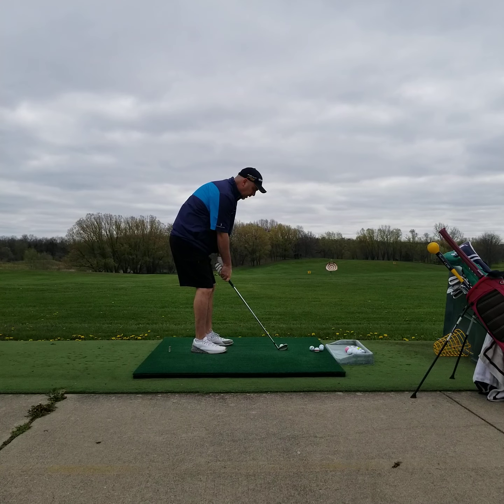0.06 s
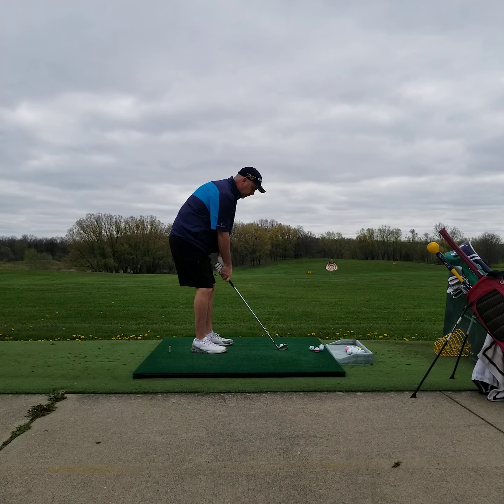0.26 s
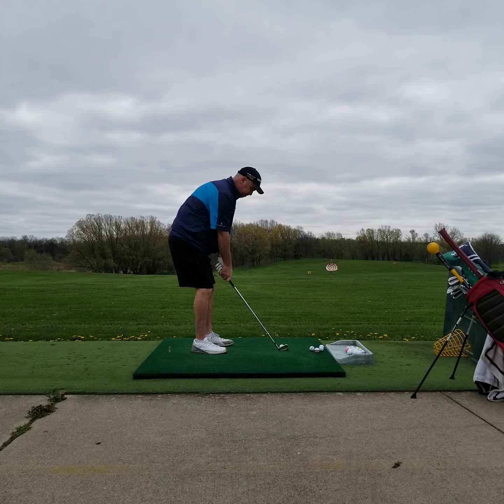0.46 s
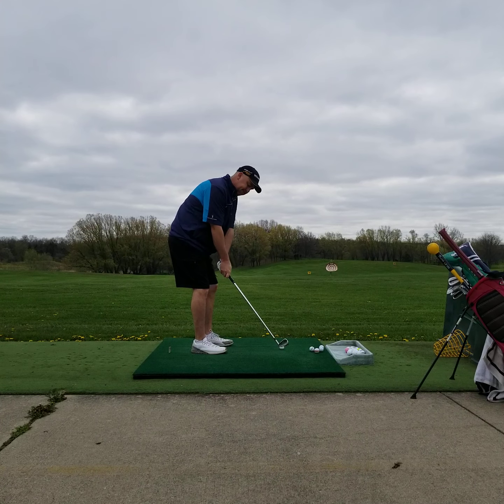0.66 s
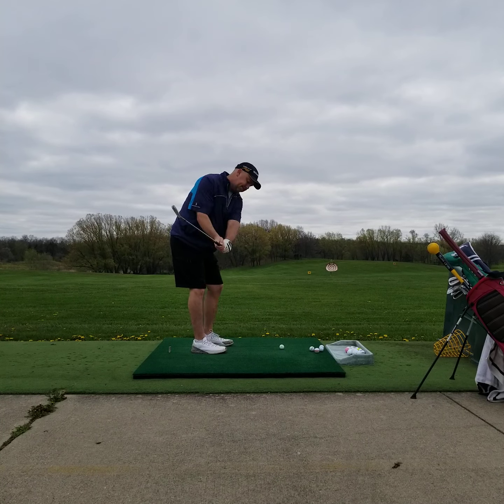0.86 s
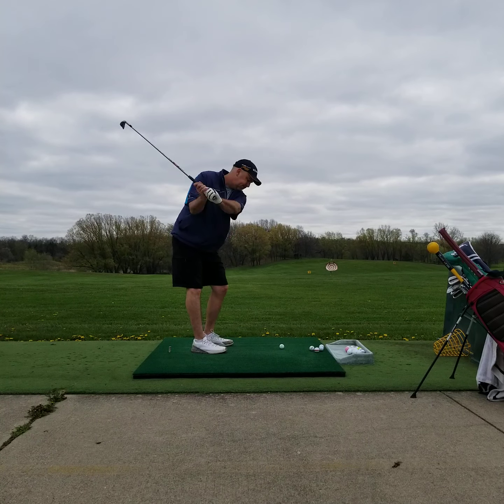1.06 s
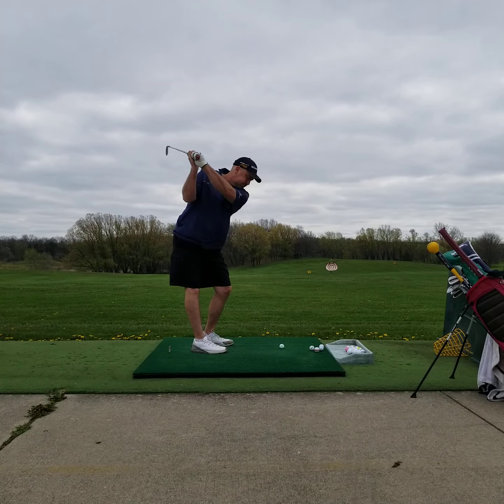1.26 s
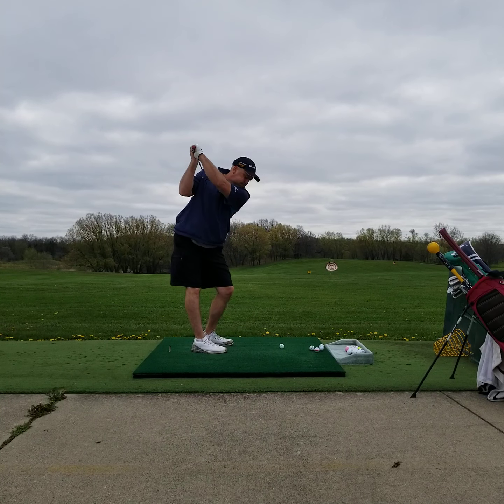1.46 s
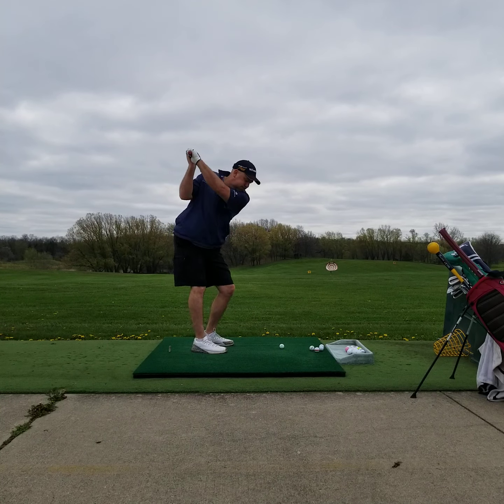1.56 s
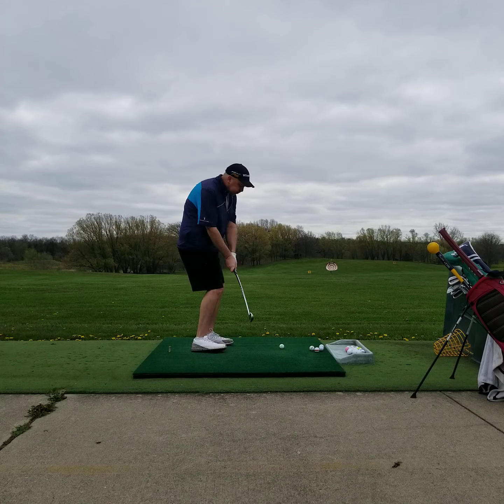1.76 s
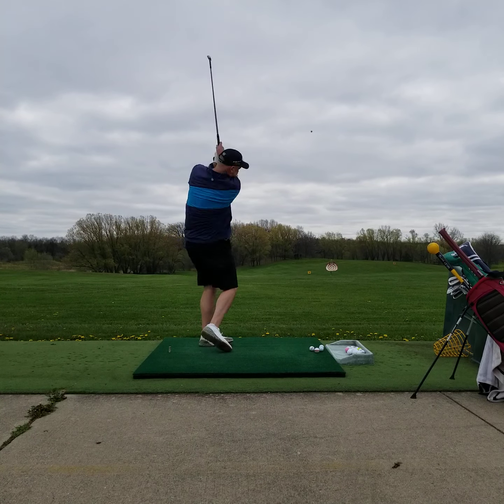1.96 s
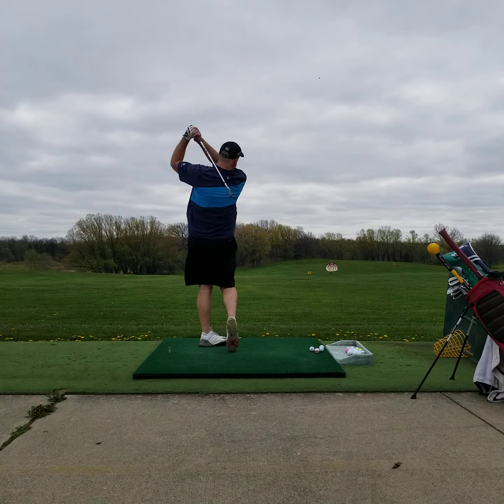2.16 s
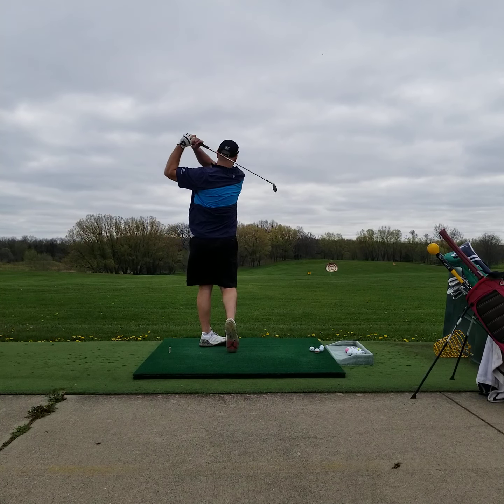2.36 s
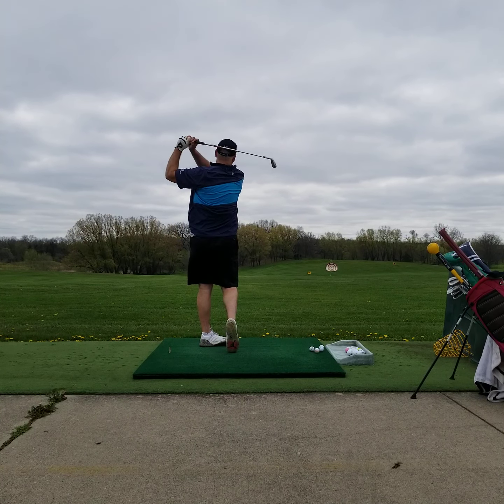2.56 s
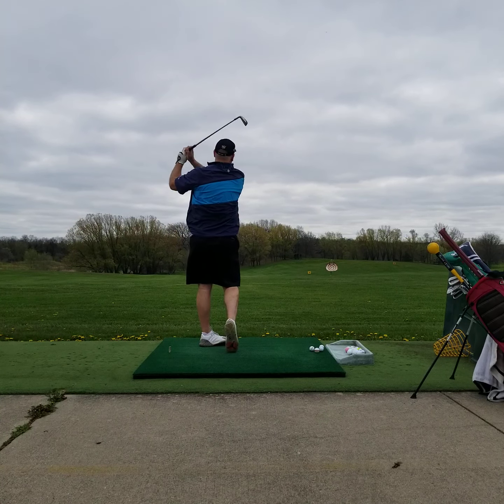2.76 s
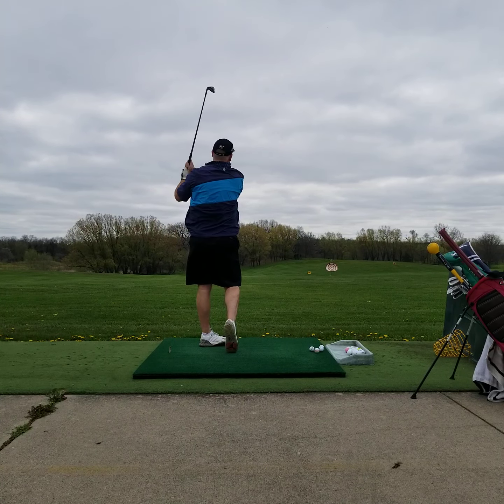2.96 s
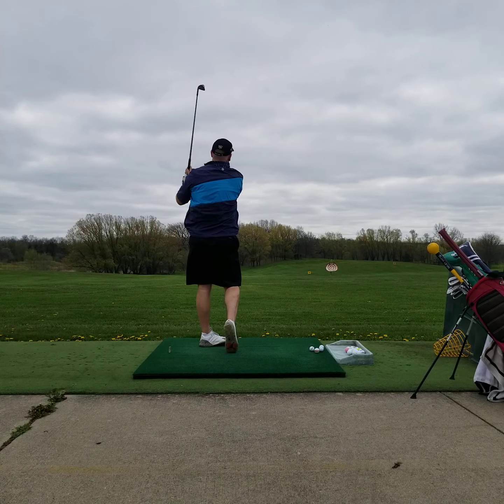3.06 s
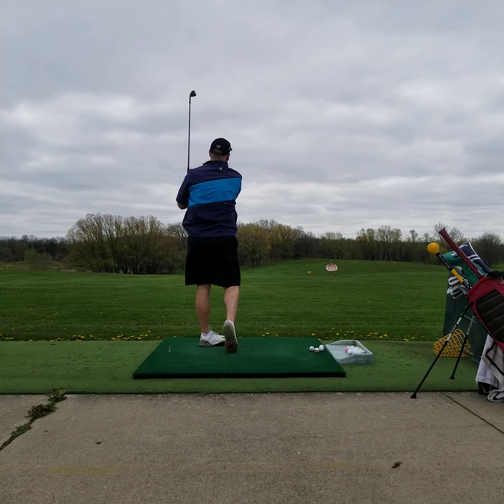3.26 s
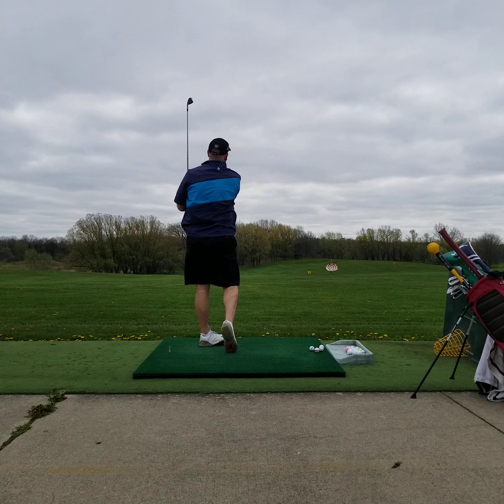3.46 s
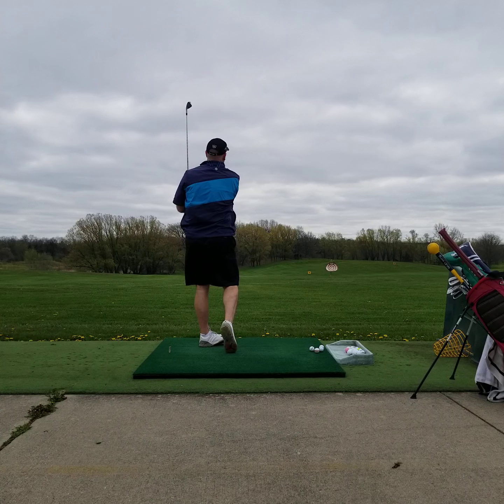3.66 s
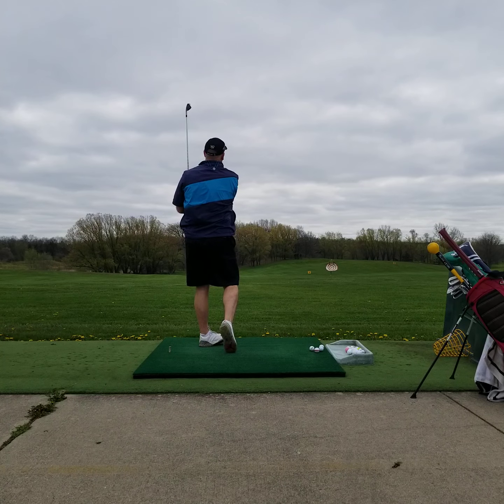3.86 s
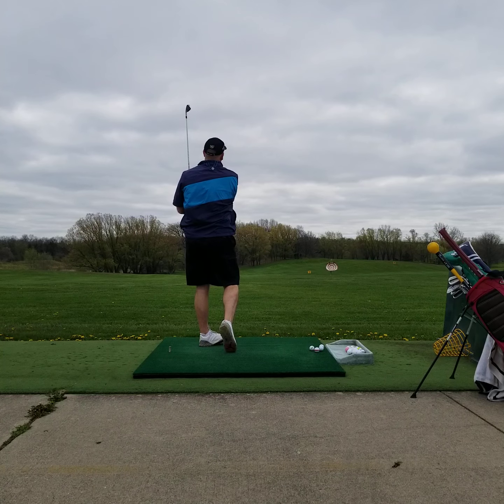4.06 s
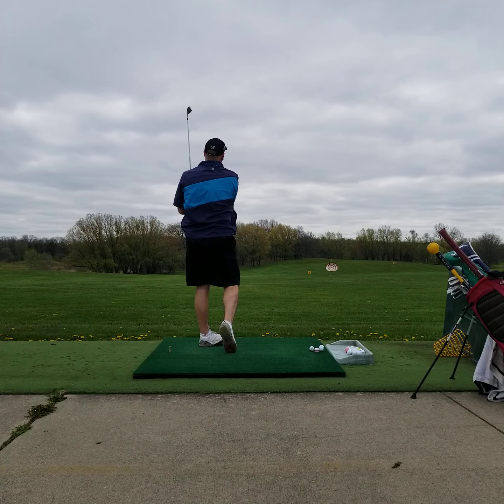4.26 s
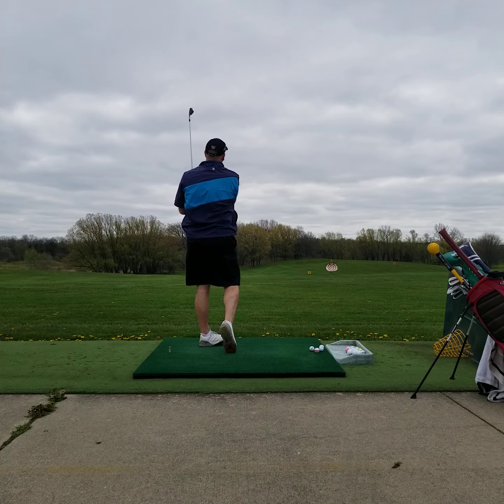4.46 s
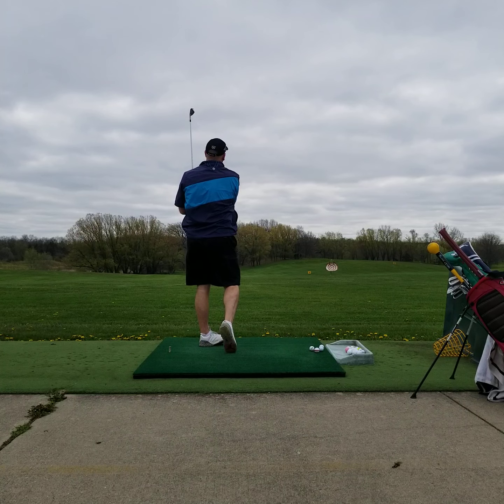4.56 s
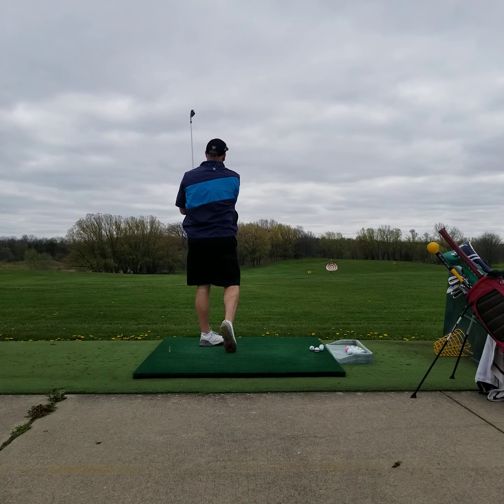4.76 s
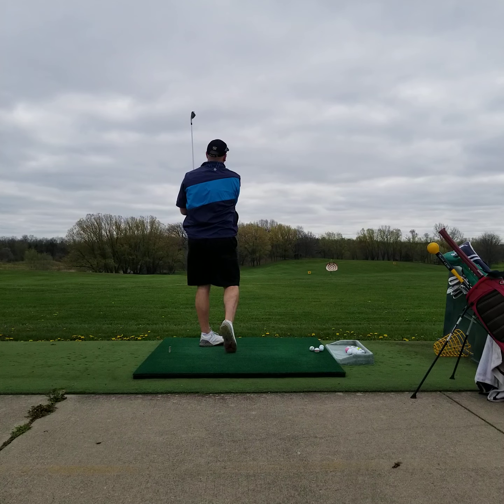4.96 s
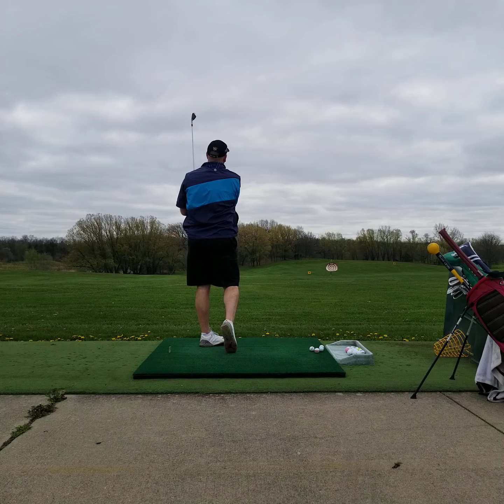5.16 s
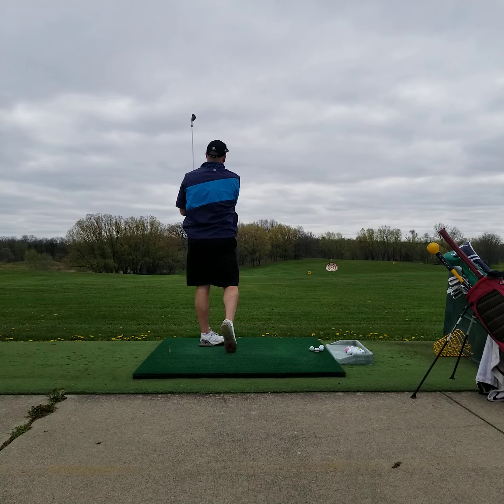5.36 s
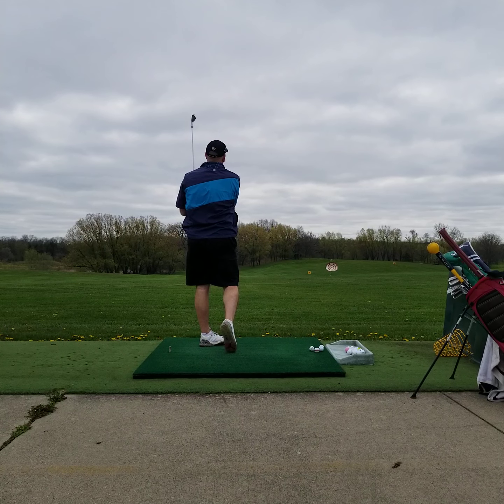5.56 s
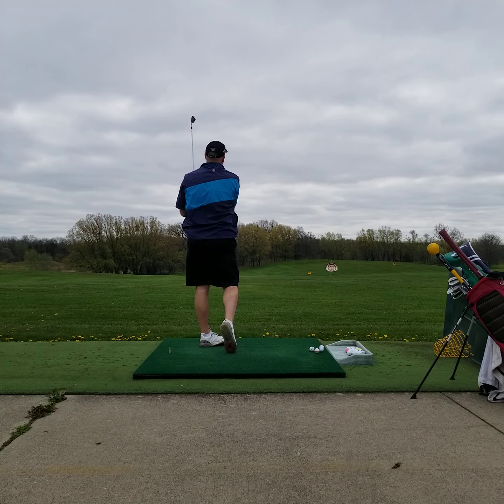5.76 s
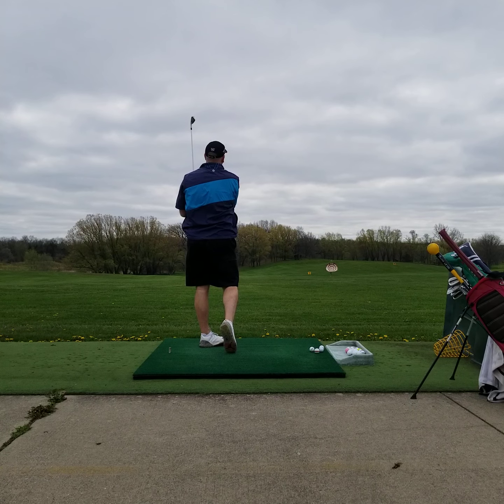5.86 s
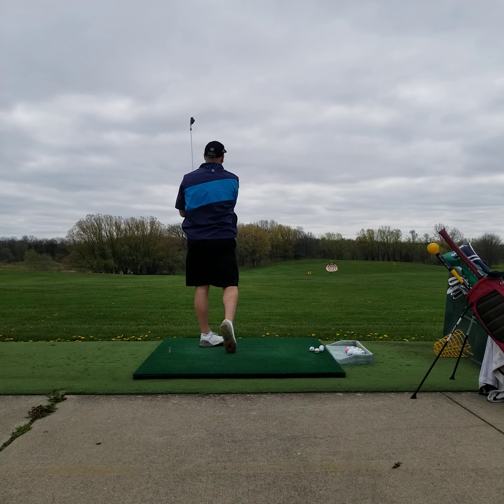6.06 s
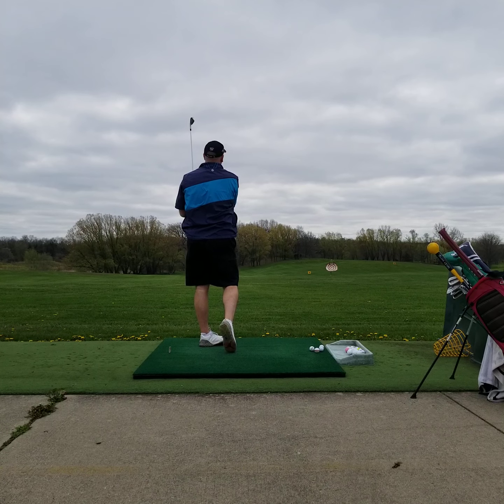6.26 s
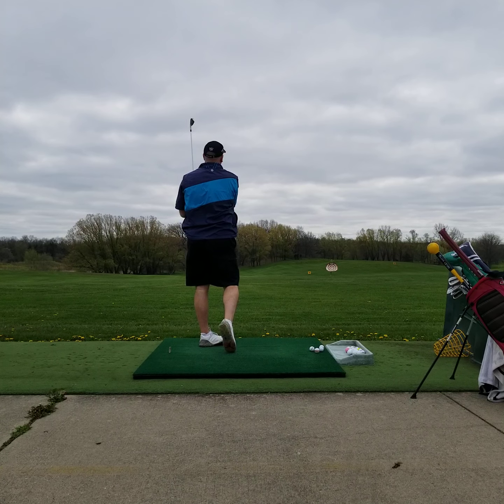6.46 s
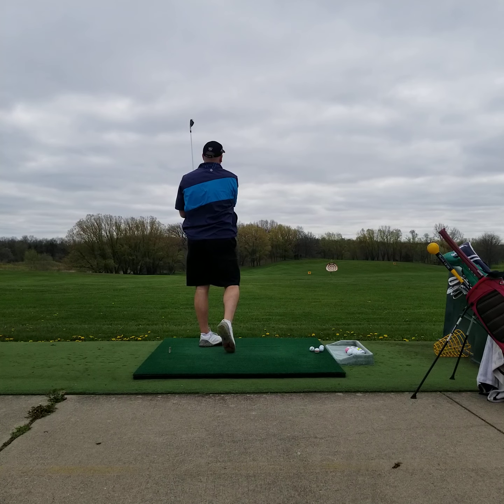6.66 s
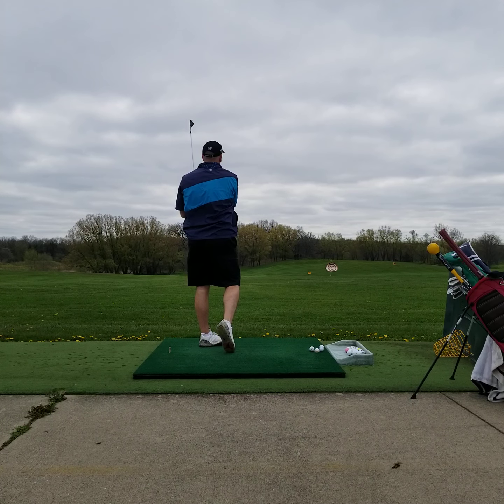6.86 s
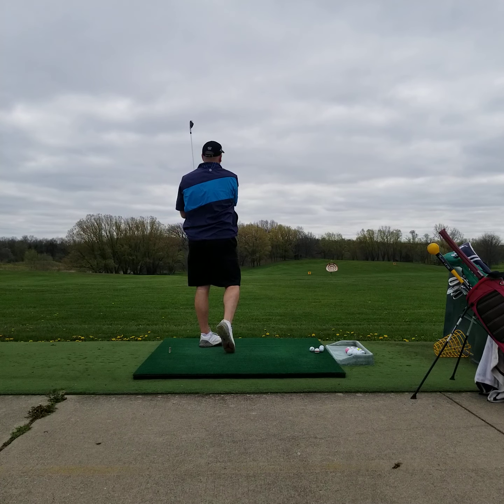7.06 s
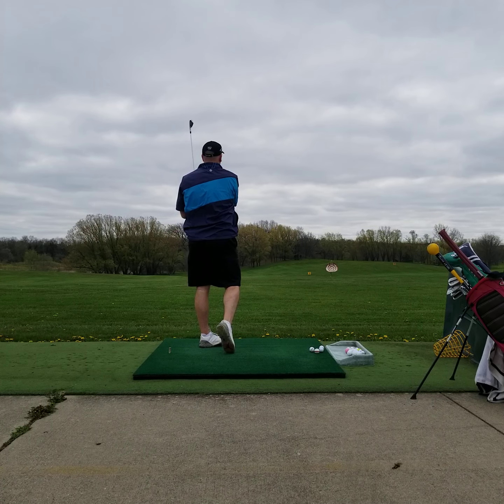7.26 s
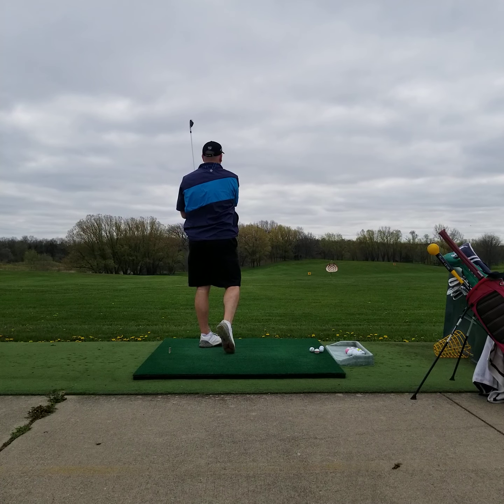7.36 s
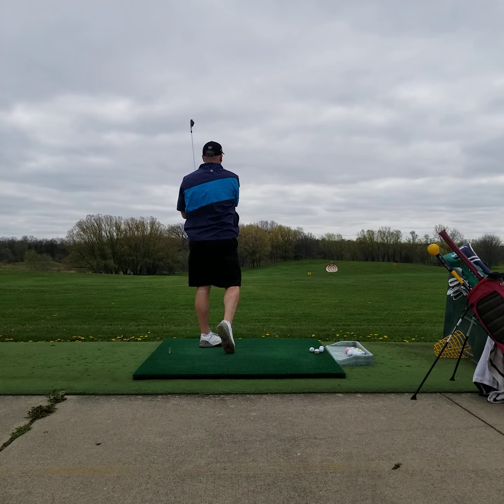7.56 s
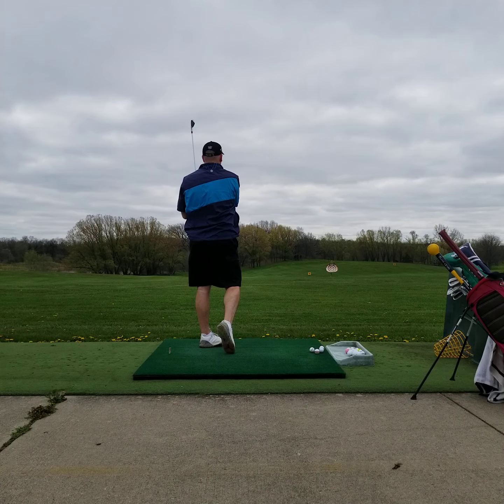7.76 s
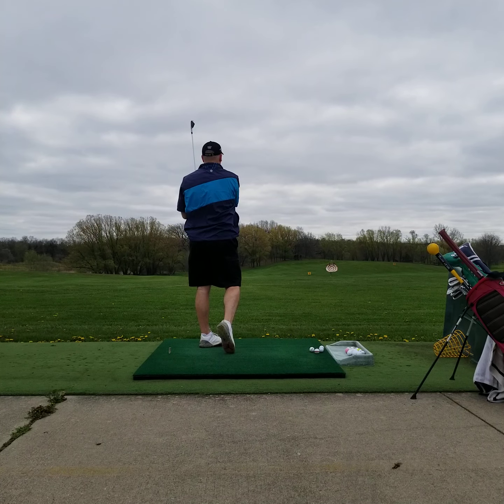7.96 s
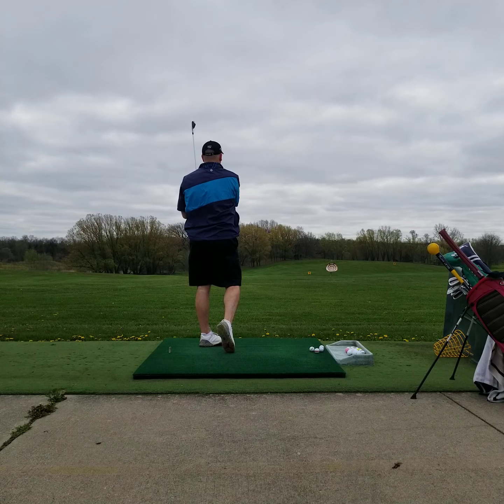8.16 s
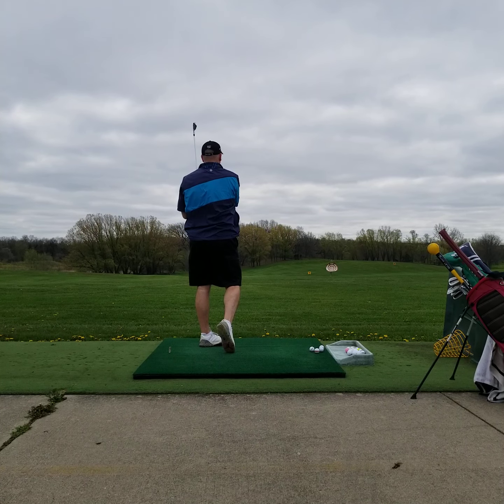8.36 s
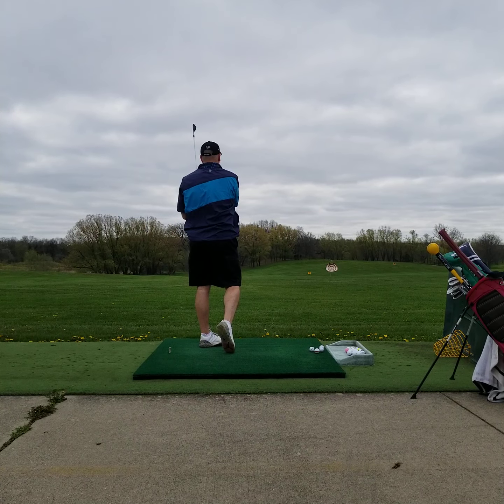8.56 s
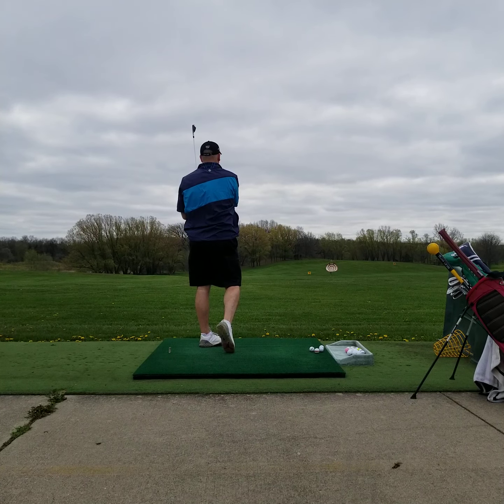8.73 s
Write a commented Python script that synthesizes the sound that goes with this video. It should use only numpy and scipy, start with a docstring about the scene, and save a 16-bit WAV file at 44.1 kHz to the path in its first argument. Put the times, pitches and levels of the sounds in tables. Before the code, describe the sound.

On an outdoor practice range, a golf club swishes through the air and hits a ball with one sharp crack, brushing the mat. Behind it, a low engine drones over road noise, growing louder, sagging slightly in pitch and then revving up near the end. Wind buffets the microphone in low gusts, and birds chirp faintly in the distance.

```python
"""An engine drones over road noise while wind buffets two closely spaced microphone ports.
At 1.8 s comes an iron shot on a practice range: the shaft sheds eddies and swishes, the face cracks
on the ball, and the sole brushes the mat. The engine, a periodic train of exhaust pulses, draws near,
sags in pitch and revs up; a steady motor hums behind it, and late on a second engine joins in.
Birds call faintly from the trees."""
import sys
import numpy as np
from scipy import signal
from scipy.fft import rfft, irfft, next_fast_len
from scipy.io import wavfile
from scipy.ndimage import map_coordinates

SR = 44100
rng = np.random.default_rng(int(sys.argv[2]) if len(sys.argv) > 2 else 0)


def master(y):
    """Save y as 16-bit WAV."""
    cut = np.clip(np.atleast_2d(y).T, -1, 1)
    pcm = np.round(cut * 32767)  # scale
    wavfile.write(sys.argv[1], SR, pcm.astype(np.int16))


N = 410571
T = np.arange(N) / SR
FFT_SIZE = next_fast_len(N)
BIN_HZ = np.maximum(np.fft.rfftfreq(FFT_SIZE, 1 / SR), 1)

# engine speed: time_s, firing_hz
FIRING_RATE = [(0, 96), (2.5, 95), (4.2, 92.2), (5.1, 90.4), (5.8, 88.4), (6.9, 84.77), (7.92, 82.7),
               (8.0, 91.14), (8.07, 103.4), (8.2, 134.4), (8.4, 148), (8.6, 158), (8.85, 162), (9.31, 161)]
# the engine nears: time_s, tone_at_resonance_db, overtone_gain_db
ENGINE_LEVELS = [(0, -45, -64.5), (1.65, -36, -57), (2.1, -45.5, -63), (2.8, -38.5, -58),
                 (3.85, -32.5, -58), (4.3, -23.5, -50), (5.7, -19, -48), (6.85, -18.5, -39),
                 (7.4, -21.5, -43), (7.75, -19.5, -40.5), (8.05, -19.5, -41.5), (8.25, -18.5, -49),
                 (8.7, -13.5, -46), (9.31, -15, -42.5)]
# traffic moving left to right: time_s, left_port_lag_s
TRAFFIC_LAG = [(0, -2e-5), (5.5, -3e-5), (7, 1e-5), (8, 6e-5), (9.3, 6.5e-5)]
# brief dips in the low end: centre_s, length_s, tone_depth_db
DIPS = [(0.067, 0.052, 9), (0.198, 0.12, 22), (1.095, 0.075, 30), (1.245, 0.17, 14), (1.462, 0.038, 30),
        (2.241, 0.19, 12), (2.56, 0.12, 5), (3.636, 0.049, 16), (3.823, 0.016, 14), (4.226, 0.017, 10),
        (4.318, 0.014, 9), (5.768, 0.032, 23), (6.322, 0.024, 11.5), (6.473, .03, 3), (6.559, 0.05, 27),
        (7.207, 0.043, 6), (7.482, 0.11, 6)]
# engine spectra: frequency_hz, gain_db
EXHAUST_SPECTRUM = [(165, 0), (182, 8), (200, 6), (255, 2), (280, 4), (340, -5), (370, -8), (440, -5),
                    (520, -17), (800, -25), (1400, -41)]
GROWL_SPECTRUM = [(200, -20), (310, 6.5), (350, 10.5), (435, 9.5), (490, -0.5), (700, -31)]  # uneven combustion
# road noise: time_s, roar_gain_db, rumble_gain_db, tread_gain_db, hiss_gain_db
ROAD_GAINS = [(0, -52.5, -49, -57, -83.5), (1.5, -50.5, -50, -57, -78.5), (2.4, -55, -50, -61, -82.5),
              (3.95, -52, -45.5, -60.5, -84.5), (4.3, -49.5, -38.5, -56.5, -76),
              (5.3, -46.5, -40.5, -58.5, -73.5), (6.7, -42.5, -35.5, -61, -67),
              (7.25, -38.5, -37.5, -55, -64.5), (8.1, -38.5, -34, -50, -64),
              (8.5, -39.5, -31.5, -51.5, -60.5), (9.31, -37, -34.5, -43, -62)]
# finest tyre noise, heard only close by: time_s, level_db
SPIT_LEVEL = [(6.5, -94), (7.2, -74), (7.9, -85), (8.4, -78), (9.4, -72)]
# single cars come into the clear: centre_s, length_s, boost_db
CAR_SURGES = [(7.22, .3, 2), (9.24, .16, 2.5)]
# road spectra: frequency_hz, gain_db
ROAR_SPECTRUM = [(200, -26), (420, -1.5), (600, 1), (800, 1), (1100, -1.5), (1600, -10), (2100, -15.5),
                 (4000, -39)]
RUMBLE_SPECTRUM = [(70, -31), (120, -4), (190, 1.5), (320, -3.5), (450, -7.5), (700, -25), (1500, -69)]
TREAD_SPECTRUM = [(700, -32), (1250, 2), (1600, 3), (2100, -5), (2700, -12), (3400, -26.5), (6000, -51.5)]
TYRE_HISS_SPECTRUM = [(1500, -15), (2800, 2), (4200, -1), (6400, -6.5), (7600, -9), (8300, -20),
                      (11000, -15.5), (13000, -17), (16000, -20)]
SPIT_SPECTRUM = [(7000, -8), (8600, 2), (10000, -5), (12000, -18)]
WHINE_SPECTRUM = [(700, -26), (795, -0.5), (880, -25)]
# gusts on the ports: peak_s, level_db
WIND_GUSTS = [(.12, -38), (.96, -38.5), (1.38, -44), (3.58, -43.5), (4.3, -36.5), (4.899, -34), (5.16, -44),
              (5.83, -27.5), (6.3, -26.5), (7.41, -26.5), (8.299, -48), (8.86, -28.5)]
# swells of high hiss: centre_s, length_s, level_db
AIR_SWELLS = [(1.35, 2, -70), (7.22, 0.36, -69.5), (7.75, 0.95, -73), (9.3, 0.54, -70)]
# wind spectra: frequency_hz, gain_db
BUFFET_SPECTRUM = [(18, -17), (32, -13), (50, -0.5), (75, 1), (110, -4.5), (170, -15.5), (300, -21.5),
                   (600, -45.5), (1500, -77.5)]
AIR_SPECTRUM = [(3000, -14), (6500, -10.5), (9000, -16.5), (11000, -6), (12500, -0.5), (15500, 0),
                (17000, -6.5)]
# single eddies: centre_s, pitch_hz, length_s, level_db
EDDIES = [(0.103, 77.5, 0.017, -24.5), (0.595, 55, 0.058, -28.5), (1.353, 78.4, 0.018, -24.5)]
# distant calls: centre_s, pitch_hz, length_s, level_db, fall_fraction
BIRD_CALLS = [(.34, 3950, .16, -83, .01), (3.62, 5230, .14, -86, 0), (4.36, 5700, .06, -83, .02),
              (4.74, 5330, .22, -85, 0), (5.12, 3980, .28, -82, .02), (6.02, 3300, .04, -70, .04),
              (6.14, 3300, .06, -72, .04), (6.28, 3300, .1, -71, .04), (6.38, 3800, .05, -71, .06),
              (6.44, 3230, .05, -70, .04), (6.53, 3170, .04, -69, .04), (6.62, 3330, .04, -66, .05),
              (6.63, 3750, .04, -68, .07), (6.78, 3280, .05, -68, .04), (6.9, 3750, .05, -68, .04),
              (6.91, 4150, .04, -66, .07), (7.1, 3300, .04, -66, .04), (7.12, 4150, .2, -73, 0),
              (7.13, 6000, .06, -72, .05), (7.42, 4130, .1, -72, .01), (7.51, 3700, .06, -69, .03),
              (7.84, 5100, .04, -70, .06)]
# many birds blurred together: frequency_hz, gain_db
TWITTER_SPECTRUM = [(3200, -9.5), (3900, 1.5), (5200, 0), (6200, -5), (7500, -20)]
# clothes moving: centre_s, length_s, level_db
CLOTH_RUSTLES = [(.87, .22, -76), (1.67, .04, -69), (2.04, .12, -74), (3.45, .4, -79.5)]
# club through the air, sole over the mat: time_s, gain_db
SWISH_ENVELOPE = [(1.62, -61), (1.762, -55), (1.775, -50), (1.797, -36), (1.815, -40), (1.83, -46.5),
                  (1.88, -57), (1.97, -77)]
BRUSH_ENVELOPE = [(1.826, -46), (1.831, -29), (1.837, -32), (1.843, -32), (1.853, -29.5), (1.861, -39),
                  (1.878, -45), (1.93, -70)]
# ball and club head ringing together: pitch_hz, level_db, t60_s
IMPACT_MODES = [(520, -22, 0.022), (1157, -16, .026), (1720, -29, 0.045), (1990, -25, 0.022),
                (2320, -29, 0.045), (2730, -42, .13), (2914, -40, .11), (4390, -27, 0.022),
                (4600, -46, .12), (5570, -29, 0.018), (7300, -23.5, 0.017), (9300, -34, 0.009),
                (11200, -23, .011), (12900, -19, .014)]
# spectra of the shot: frequency_hz, gain_db
CLOTH_SPECTRUM = [(2500, -3), (4500, 3), (8500, -7.5), (12000, -12)]
SHAFT_SPECTRUM = [(2500, -10), (4000, -0.5), (6300, 2), (9000, -9)]
BRIGHT_HISS_SPECTRUM = [(1800, -8), (3000, -2.5), (5500, -2), (8000, -12)]
SWISH_SPECTRUM = [(150, -13), (350, -5), (520, 2.5), (650, -1), (820, -5.5), (1500, -8.5), (2400, -13.5),
                  (4000, -23), (8000, -27), (15000, -26)]
CRACK_SPECTRUM = [(500, -14), (1500, -9), (2300, -6), (3200, -12), (6000, -3), (8500, -3), (10000, -3),
                  (11500, 1), (13000, 3), (16000, -2), (18000, -20)]
TURF_SPECTRUM = [(120, -5.5), (300, 7), (600, 3.5), (1100, -6), (2000, -5), (2800, -8.5), (3800, -17),
                 (6000, -11.5), (10000, -15.5), (15500, -11.5)]
BRISTLE_SPECTRUM = [(6000, -12), (8500, -3.5), (12500, -2.5), (15500, -1.5)]
SCUFF_SPECTRUM = [(400, -5.5), (1200, -4), (2000, 0), (2900, -1.5), (3800, -22.5)]
ECHO_SPECTRUM = [(150, -12.5), (400, -3.5), (1500, -2.5), (3000, -9.5), (6000, -4), (10000, -8),
                 (15500, -9.5)]
# faint ticks: start_s, level_db, t60_s
TICK_EVENTS = [(2.81, -74, 0.089), (6.45, -62.5, 0.078)]
# their colour: frequency_hz, gain_db
TICK_SPECTRUM = [(3000, -27), (6300, 4), (8500, -15), (12000, -2), (15500, -6)]
# steady motor: time_s, gain_db
MOTOR_GAIN = [(3.5, -66), (4.5, -51), (6.9, -46), (9.31, -44.5)]
# second engine: time_s, firing_hz, gain_db
SECOND_ENGINE = [(8.15, 86, -24), (8.3, 90.5, -26), (8.5, 97.8, -24.5), (8.7, 101.5, -28.5), (9, 101, -30),
                 (9.3, 103, -35)]
# their harmonic series: harmonic_number, gain_db
MOTOR_HARMONICS = [(1, 0.5), (2, -5.5)]
SECOND_HARMONICS = [(1, 0), (2, -10), (3, -7), (4, -26)]

IMPACT_S = 1.8285
SHOT_LAG_S = 8.5e-5  # the shot reaches the right port first


def undb(db):
    """Amplitude ratio of a level in decibels."""
    return 10 ** (np.asarray(db) / 20)


def unit(x):
    """Normalisation to an rms of one."""
    return x / np.sqrt(np.mean(x ** 2))


def curves(rows):
    """Linear interpolation of each column over the time in the first."""
    times, *columns = np.transpose(rows)
    return [np.interp(T, times, column) for column in columns]


def swell(rows):
    """Envelope interpolated in decibels, silent outside its rows."""
    times, db = np.transpose(rows)
    return undb(np.interp(T, times, db, left=-200, right=-200))


def bell(centre_s, length_s):
    """Gaussian envelope, length_s wide at 1/e of its peak."""
    return np.exp(-(2 * (T - centre_s) / length_s) ** 2)


def decay(start_s, t60_s, hold_s=0):
    """Exponential decay after a sudden onset and an optional hold."""
    return (T >= start_s) * np.exp(-np.log(1000) * np.maximum(T - start_s - hold_s, 0) / t60_s)


def walk(rate_hz, size=32768):
    """Random modulation: low-passed noise with an rms of one."""
    hz = np.fft.rfftfreq(size, T[-1] / size)
    slow = irfft(rfft(rng.standard_normal(size)) / (1 + (hz / rate_hz) ** 4))
    return unit(np.interp(T, np.linspace(0, T[-1], size), slow))


def gain_db_at(hz, spectrum):
    """Spectral envelope, interpolated over log frequency."""
    points_hz, db = np.transpose(spectrum)
    return np.interp(np.log(hz), np.log(points_hz), db)


def ports(x, lag_s):
    """Path difference: the left port receives the wave lag_s after the right."""
    return np.array([map_coordinates(x, [(T - lag_s) * SR], order=3, mode="nearest"), x])


def noise(spectrum, shared, lag_s=0):
    """Partially coherent stereo noise; shared is the fraction of power common to both ports."""
    low_hz, high_hz = spectrum[0][0], spectrum[-1][0]
    skirts = np.minimum(BIN_HZ / low_hz, 1) ** 2 * np.minimum(high_hz / BIN_HZ, 1) ** 4
    colour = undb(gain_db_at(BIN_HZ, spectrum)) * skirts
    white = rng.standard_normal((3, N))
    pair = np.sqrt(shared) * ports(white[0], lag_s) + np.sqrt(1 - shared) * white[1:]
    return unit(irfft(rfft(pair, FFT_SIZE) * colour, FFT_SIZE)[:, :N])


def dip_db():
    """Attenuation of the firing tone; other low sounds take a fraction of it."""
    return sum(db * bell(s, length) for s, length, db in DIPS)


def firing_phase(hz, jitter):
    """Phase is the integral of frequency, here a slightly uneven firing rate."""
    return 2 * np.pi * np.cumsum(hz * (1 + jitter * walk(16.8))) / SR


def harmonics(phase, orders, flutter_db):
    """Harmonic series whose partials flutter independently on their way through moving air."""
    total = np.zeros(N)
    for k, db in orders:
        amplitude = np.sqrt(2) * undb(db + flutter_db * walk(8))
        total += amplitude * np.sin(k * phase + rng.uniform(0, 2 * np.pi))
    return total


def engine(resonance_hz=96.9, bandwidth_hz=11):
    """Source and filter: the exhaust pipe booms when the firing rate meets its resonance."""
    hz, tone_db, overtone_db, lag = curves(FIRING_RATE) + curves(ENGINE_LEVELS) + curves(TRAFFIC_LAG)
    overtone_db -= 0.44 * dip_db()
    phase = firing_phase(hz, jitter=0.0063)
    resonance = 1 / np.hypot(1, 2 * (hz - resonance_hz) / bandwidth_hz)
    remoteness = (tone_db.max() - tone_db) / np.ptp(tone_db)
    waver_db = (1.1 + 2 * remoteness) * walk(14)
    tone = resonance * undb(tone_db - dip_db() + waver_db) * np.sqrt(2) * np.sin(phase)
    orders = [(k, gain_db_at(k * hz, EXHAUST_SPECTRUM)) for k in range(2, 9)]
    overtones = undb(overtone_db) * (1 + 0.21 * walk(48)) * harmonics(phase, orders, flutter_db=2)
    surge = bell(6.95, 1)  # the sound thickens before the rev
    # unequal cylinders add partials halfway between the harmonics
    half_orders = harmonics(phase / 2, [(7, -5), (9, 0), (11, -7)], flutter_db=3)
    lope = undb(overtone_db - 8.5) * surge * half_orders
    growl = undb(overtone_db - 14 + 9.5 * surge + 1.3 * walk(8.3)) * noise(GROWL_SPECTRUM, 1, lag)
    return ports(tone + overtones + lope, lag) + growl


def road():
    """Broadband noise of tyres and exhausts grows as the traffic nears, over a faint steady whine."""
    roar_db, rumble_db, tread_db, hiss_db, lag = curves(ROAD_GAINS) + curves(TRAFFIC_LAG)
    surge_db = sum(db * bell(s, length) for s, length, db in CAR_SURGES)
    roar = undb(roar_db + surge_db - 0.14 * dip_db() + 0.6 * walk(11)) * noise(ROAR_SPECTRUM, 0.94, lag)
    rumble = undb(rumble_db - 3.2 - 0.4 * dip_db() + 1.3 * walk(27)) * noise(RUMBLE_SPECTRUM, 1, lag)
    tread = undb(tread_db + surge_db + 0.9 * walk(16)) * noise(TREAD_SPECTRUM, 0.73, lag)
    hiss = undb(hiss_db + 4.5 + 0.5 * walk(9)) * noise(TYRE_HISS_SPECTRUM, 0.13, lag)
    spit = undb(0.5 * walk(9)) * swell(SPIT_LEVEL) * noise(SPIT_SPECTRUM, shared=0.2)
    whine = undb(-63.5) * noise(WHINE_SPECTRUM, shared=0.71)
    lean_left = undb([[0.6], [-0.6]])
    return (roar + rumble + tread + hiss + spit + whine) * lean_left


def wind(attack_s=0.066, release_s=0.092):
    """Turbulent pressure of breeze and gusts buffets each port, under a faint high hiss."""
    breeze = undb(-41.5 + 10 * bell(7.2, 3.9) - 0.17 * dip_db())
    gusts = sum(undb(db) * np.exp(-np.maximum((s - T) / attack_s, (T - s) / release_s))
                for s, db in WIND_GUSTS)
    puffs_db = 1.1 * walk(9.9) + 0.91 * np.array([walk(28) for port in range(2)])
    buffet = np.hypot(breeze, gusts) * undb(puffs_db) * noise(BUFFET_SPECTRUM, shared=0.53)
    swells = sum(undb(db) * bell(s, length) for s, length, db in AIR_SWELLS)
    hiss = np.hypot(undb(-76.5), swells) * undb(0.6 * walk(14)) * noise(AIR_SPECTRUM, shared=0.11)
    return buffet + hiss


def eddies():
    """Forced vibration: a strong eddy rocks the diaphragms for a few cycles."""
    return sum(undb(db) * bell(s, length) * np.sin(2 * np.pi * hz * (T - s))
               for s, hz, length, db in EDDIES)


def birds():
    """Scattering in the trees blurs the amplitude and phase of chirps and whistles over a far twitter."""
    calls = np.zeros(N, complex)
    for s, hz, length, db, fall in BIRD_CALLS:
        near = np.abs(T - s) < 2 * length
        along = (T[near] - s) / length
        phase = 2 * np.pi * np.cumsum(hz * (1 - fall * along)) / SR
        calls[near] += undb(db) * np.exp(-(2 * along) ** 2 + 1j * phase)
    twitter = undb(-85 + 2.5 * walk(12)) * noise(TWITTER_SPECTRUM, shared=0.05)
    scattering = walk(70) + 1j * walk(70)
    return np.real(calls * scattering) + twitter


def clothes():
    """Friction noise of shirt and sleeves as the arms move."""
    movement = sum(undb(db) * bell(s, length) for s, length, db in CLOTH_RUSTLES)
    return movement * undb(2 * walk(40)) * noise(CLOTH_SPECTRUM, shared=0.33)


def swing(whistle_hz=635):
    """Vortex shedding: the shaft hisses and swishes, and a rough whistle marks full speed."""
    downswing = swell([(IMPACT_S - 0.1835, -77), (IMPACT_S, -61.5)])
    shaft = downswing * noise(SHAFT_SPECTRUM, shared=0.14)
    # a bright hiss starts abruptly just before the strike
    hiss_onset = decay(1.77, t60_s=0.06, hold_s=0.035)
    bright_hiss = undb(-54 + 2 * walk(153)) * hiss_onset * noise(BRIGHT_HISS_SPECTRUM, 0.7, SHOT_LAG_S)
    swish = swell(SWISH_ENVELOPE) * noise(SWISH_SPECTRUM, 0.8, SHOT_LAG_S)
    shedding_hz = whistle_hz * (1 + 0.07 * walk(120))
    whistle = undb(-41) * bell(1.805, 0.045) * np.sin(2 * np.pi * np.cumsum(shedding_hz) / SR)
    return shaft + bright_hiss + swish + ports(whistle, SHOT_LAG_S)


def impact_pulse(spectrum, size=512):
    """Minimum phase gives the sharpest pulse of a spectrum; it starts at impact, with a peak of one."""
    hz = np.maximum(np.fft.rfftfreq(size, 1 / SR), 1)
    cepstrum = irfft(np.log(undb(gain_db_at(hz, spectrum))))
    cepstrum[1:size // 2] *= 2  # fold onto positive time
    cepstrum[size // 2 + 1:] = 0
    pulse = irfft(np.exp(rfft(cepstrum)))
    start = int(IMPACT_S * SR)
    return np.pad(pulse / np.abs(pulse).max(), (start, N - start - size))


def strike(reflection_s=0.00055):
    """Impact excites damped modes of ball and head, with a crack that the ground reflects."""
    age = np.maximum(T - IMPACT_S, 0)
    compression = 1 - np.exp(-age / 0.00015)  # the ball flattens on the face
    ring = -compression * sum(undb(db) * decay(IMPACT_S, t60) * np.sin(2 * np.pi * hz * age)
                              for hz, db, t60 in IMPACT_MODES)
    crack = undb(-6.5) * impact_pulse(CRACK_SPECTRUM)
    reflection = undb(2) * np.roll(crack, int(reflection_s * SR))
    splinter = undb(-10) * decay(IMPACT_S, t60_s=0.009) * noise(CRACK_SPECTRUM, 0.73, SHOT_LAG_S)
    return ports(ring + crack + reflection, SHOT_LAG_S) + splinter


def mat(thump_s=1.8294, thump_hz=280):
    """Damped vibration and friction: the mat thumps, and its plastic bristles rasp under the sole."""
    thump = undb(-14.5) * decay(thump_s, t60_s=0.019) * np.sin(2 * np.pi * thump_hz * (T - thump_s))
    brush = swell(BRUSH_ENVELOPE) * undb(walk(450) - 0.5) * noise(TURF_SPECTRUM, 0.8, lag_s=4e-5)
    ploughing = decay(IMPACT_S, t60_s=0.044, hold_s=0.022)
    bristles = undb(-40.5 + 1.5 * walk(600)) * ploughing * noise(BRISTLE_SPECTRUM, shared=0.38)
    leaving = decay(1.849, t60_s=0.11)
    scuff = undb(-38 + 4.3 * walk(300)) * leaving * noise(SCUFF_SPECTRUM, 0.7, SHOT_LAG_S)
    return ports(thump, SHOT_LAG_S) + brush + bristles + scuff


def echo():
    """Diffuse scattering from the surroundings leaves a faint tail after the strike."""
    return undb(-55) * decay(IMPACT_S, t60_s=1) * noise(ECHO_SPECTRUM, shared=0.31)


def ticks():
    """Short, exponentially decaying noise is heard as small dry ticks."""
    envelope = sum(undb(db) * decay(s, t60) for s, db, t60 in TICK_EVENTS)
    return envelope * noise(TICK_SPECTRUM, shared=0.5)


def motor(firing_hz=138.9):
    """Periodic firing at a steady rate gives a hum that emerges further back."""
    db, lag = curves(MOTOR_GAIN) + curves(TRAFFIC_LAG)
    phase = firing_phase(firing_hz, jitter=0.008)
    return ports(undb(db) * harmonics(phase, MOTOR_HARMONICS, flutter_db=2), lag)


def flock(pitches_hz=(3200, 3330, 3750, 4150), chatter_hz=14):
    """Amplitude modulation breaks each bird's pitch into quick, overlapping notes."""
    voices = np.zeros(N)
    for hz in pitches_hz:
        notes = np.maximum(walk(chatter_hz), 0)
        blur = walk(120) + 1j * walk(120)
        voices += notes * np.real(blur * np.exp(2j * np.pi * hz * T))
    return undb(-73.5) * bell(6.8, 1.7) * voices


def second_engine(onset_s=0.023):
    """A second harmonic series enters abruptly and rises in pitch with its firing rate."""
    hz, db, lag = curves(SECOND_ENGINE) + curves(TRAFFIC_LAG)
    entry = np.clip((T - SECOND_ENGINE[0][0]) / onset_s, 0, 1)
    drone = harmonics(firing_phase(hz, jitter=0.0076), SECOND_HARMONICS, flutter_db=1)
    return ports(entry * undb(db - 5) * drone, lag)


def scene():
    """Superposition: the pressures of shot, traffic, wind and birds add at each port."""
    shot = swing() + strike() + mat() + echo() + clothes()
    traffic = engine() + second_engine() + motor() + road()
    return shot + traffic + wind() + eddies() + birds() + flock() + ticks()


def record(dry):
    """Soft saturation rounds the loudest peak, and a low-pass filter cuts the top."""
    ceiling, cutoff_hz = 0.55, 15750
    lowpass = signal.ellip(8, 0.2, 70, cutoff_hz, fs=SR, output="sos")
    return signal.sosfilt(lowpass, ceiling * np.tanh(dry / ceiling))


dry = scene()
out = record(dry)
master(out)
```